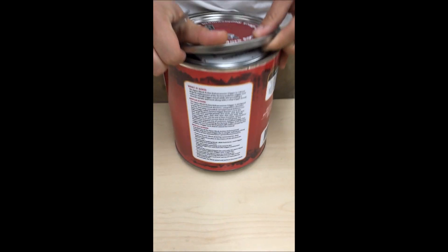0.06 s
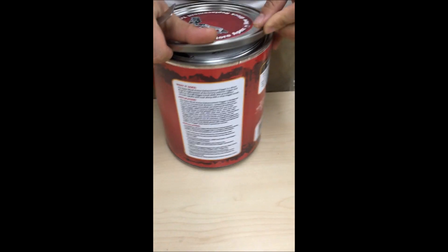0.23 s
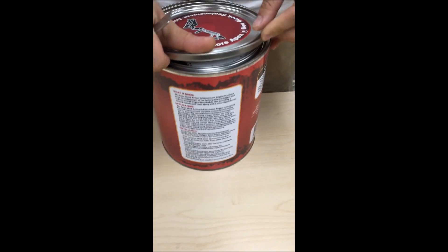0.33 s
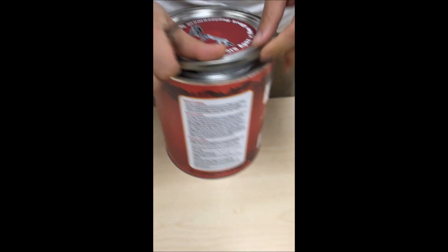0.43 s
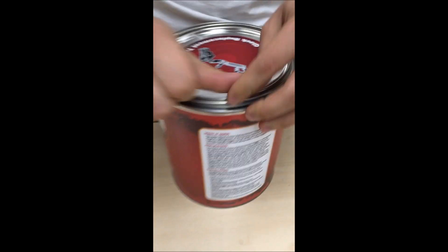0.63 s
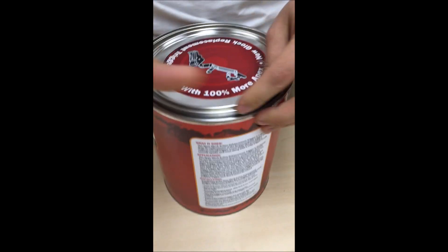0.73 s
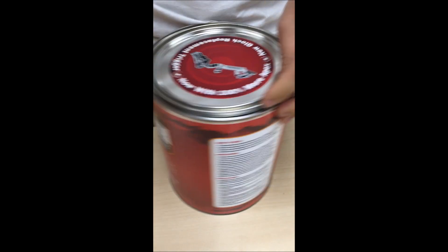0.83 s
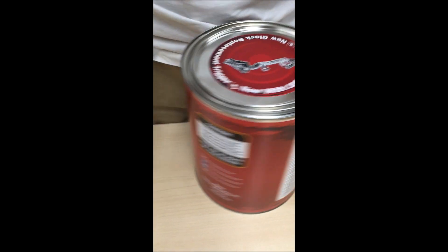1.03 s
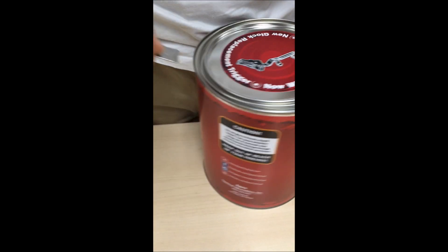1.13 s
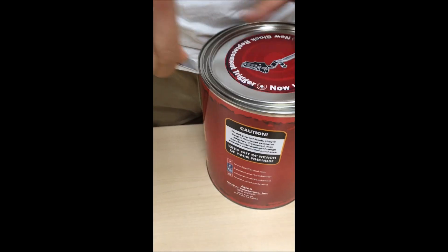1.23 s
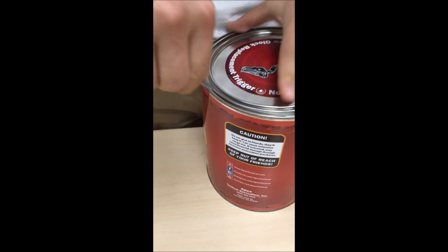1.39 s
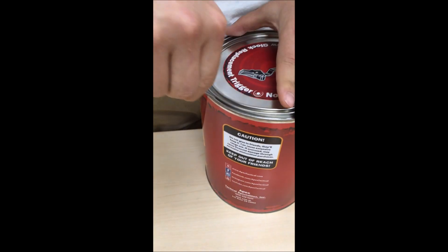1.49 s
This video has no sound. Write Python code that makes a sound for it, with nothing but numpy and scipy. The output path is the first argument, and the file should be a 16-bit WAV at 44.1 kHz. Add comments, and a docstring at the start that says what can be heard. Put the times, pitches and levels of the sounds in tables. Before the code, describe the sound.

A metal lid rubs and snaps onto a large can with a hollow thump. A dull knock and another push follow, then the can scrapes across a wooden table. Close microphone in a small, quiet room.

```python
"""A metal lid is fitted on a large can on a wooden table; small quiet room, one microphone close by.
The lid ticks twice, rubs, and snaps over the rim at 0.24 s; each push makes the enclosed air thump.
At 0.47 s the can's wall takes a dull knock, and at 0.74 s the lid is pressed home. From 0.86 s the
can is turned and scrapes across the table, its base juddering lower in pitch as it slows."""
import sys
import numpy as np
from scipy import signal
from scipy.fft import rfft, irfft
from scipy.io import wavfile
from scipy.ndimage import uniform_filter1d

SR = 44100
rng = np.random.default_rng(int(sys.argv[2]) if len(sys.argv) > 2 else 0)


def transcribe(u):
    """Save the signal u as a 16-bit wav file named by the first command-line argument.

    u: samples, shape (n,) or (channels, n), limited to [-1, 1]; the rate is SR.
    q: integer samples, one column per channel.
    """
    v = np.clip(np.atleast_2d(u).T, -1, 1)
    q = np.round(v * 32767).astype(np.int16)
    wavfile.write(sys.argv[1], SR, q)


N = 68355
T = np.arange(N) / SR

# modes of the loose lid: f/Hz, level/dB, t60/s
LID_MODES = [(716, -17.5, .08), (1052, -4, 0.092), (1446, -10, .08), (2299, -6.5, 0.11), (2942, 4.5, 0.021),
             (3503, 6.5, 0.017), (4259, 0.5, 0.029), (4604, -3.5, .025), (5820, 2.5, 0.014),
             (6030, -12, 0.061), (6490, 0.5, 0.03), (8220, -6.5, 0.035), (9180, -1, .02), (12200, -3, .018)]
# modes of the can's wall: f/Hz, level/dB, t60/s
WALL_MODES = [(305, -5.5, .08), (465, -6, 0.13), (597, -0.5, 0.13), (735, 0.5, .065), (927, -6.5, 0.071),
              (1019, -12, 0.073), (1290, -7.5, 0.12), (1392, -8.5, 0.1), (1527, -3.5, 0.037),
              (1920, -13, 0.076), (2236, -20, .07)]


def amp(db):
    """Decibels to gain."""
    return 10 ** (np.asarray(db) / 20)


def unit(x):
    """Scale to rms 1."""
    return x / np.sqrt(np.mean(x ** 2))


def curve(rows, column=1):
    """One column of a table, joined by straight lines in time."""
    rows = np.array(rows)
    return np.interp(T, rows[:, 0], rows[:, column])


def through(x, response):
    """Sound passed through an impulse response."""
    return signal.fftconvolve(x, response)[:N]


def colour(x, spectrum, size=8192):
    """Minimum-phase filter of unit power with the given spectral shape."""
    hz, db = np.array(spectrum).T
    gain = amp(np.interp(np.log(np.fft.rfftfreq(size, 1 / SR) + 1), np.log(hz), db))
    cepstrum = irfft(np.log(unit(gain)))
    cepstrum[1:size // 2] *= 2
    cepstrum[size // 2 + 1:] = 0
    return through(x, irfft(np.exp(rfft(cepstrum))))


def wander(per_s):
    """Random values of rms 1, gliding from one to the next."""
    hold = int(SR / per_s)
    steps = np.repeat(rng.standard_normal(N // hold + 1), hold)
    return unit(uniform_filter1d(steps, hold)[:N])


def envelope(start, rise, t60):
    """Smooth rise, then exponential decay."""
    age = T - start
    attack = np.sin(np.pi / 2 * np.clip(age / rise, 0, 1)) ** 2
    return attack * np.exp(-np.log(1000) * np.maximum(age - rise, 0) / t60)


def ring(modes, start, rise, swell_cycles=3.5):
    """Decaying modes set going at one moment; the low ones take longer to swell."""
    return sum(amp(db) * envelope(start, max(rise, swell_cycles / hz), t60)
               * np.sin(2 * np.pi * (hz * T + rng.random())) for hz, db, t60 in modes)


def room_tone(level_db=-60.5):
    """The faint, steady air of the room."""
    # spectrum of the room's air: f/Hz, level/dB
    spectrum = [(25, -22), (45, -11), (70, -1), (140, -4), (260, -19.5), (550, -24), (1000, -34.5),
                (2200, -25.5), (3000, -34), (5000, -41.5), (10000, -36.5), (16000, -39)]
    return amp(level_db) * colour(rng.standard_normal(N), spectrum)


def room(x, reverb_db=-18):
    """The direct sound at the microphone, followed by a small room's short, dull reverberation."""
    # spectrum of the reverberation: f/Hz, level/dB
    spectrum = [(60, -15), (150, -5.5), (400, 1), (1200, -13.5), (3000, -13), (7000, -16.5), (16000, -18.5)]
    decay = envelope(start=.0026, rise=.0026, t60=.21)
    tail = unit(rng.standard_normal(N) * decay) / np.sqrt(N)
    return x + amp(reverb_db) * through(x, colour(tail, spectrum))


def table_rumble():
    """The wooden table rumbles low under the can."""
    # course of the rumble: t/s, level/dB
    levels = [(0, -72), (.05, -55), (.12, -72), (.3, -57), (.42, -54), (.6, -54.5), (.73, -46), (.775, -38),
              (.83, -52), (.89, -77), (.95, -52), (.99, -36), (1.035, -68), (1.09, -54), (1.25, -52),
              (1.42, -56.5), (1.55, -60)]
    # spectrum of the rumble: f/Hz, level/dB
    spectrum = [(20, -32), (40, -17), (55, -13), (66, -2.5), (85, -4.5), (130, -18), (250, -42.5),
                (600, -75)]
    return unit(colour(rng.standard_normal(N), spectrum)) * amp(curve(levels))


def fine_ringing(x, from_hz=1130, direct_db=1, ring_db=-8):
    """A short random response gives the hiss a dense, quickly damped ringing colour."""
    decay = envelope(start=0, rise=1 / SR, t60=.026)
    response = unit(rng.standard_normal(N) * decay) / np.sqrt(N)
    response = signal.sosfilt(signal.butter(2, from_hz, "high", fs=SR, output="sos"), response)
    return amp(direct_db) * x + amp(ring_db) * through(x, response)


def grains(per_s=7600, spread_db=1.5):
    """Dense tiny slips of uneven size."""
    slips = rng.random(N) < per_s / SR
    return unit(slips * rng.standard_normal(N) * amp(spread_db * rng.exponential(size=N)))


def friction(levels, spectrum, modes, ring_db, flutter_db=.74):
    """Fluttering slips, heard with a fine ringing and through the main modes of the rubbed part."""
    slips = grains() * amp(curve(levels) + flutter_db * wander(per_s=45))
    body = unit(ring(modes, 0, 1 / SR)) / np.sqrt(N)
    return fine_ringing(colour(slips, spectrum)) + amp(ring_db) * through(slips, body)


def fingers():
    """Fingers hiss over the lid and stir its modes."""
    # course of the fingers' sliding: t/s, level/dB
    levels = [(0, -57.5), (.055, -71), (.1, -73.5), (.19, -61), (.235, -47), (.275, -60), (.33, -63.5),
              (.415, -49), (.46, -63), (.52, -64.5), (.58, -59), (.65, -57.5), (.735, -48.5), (.775, -75),
              (.86, -66), (.95, -75), (1.41, -81), (1.445, -70.5), (1.55, -82)]
    # spectrum of skin on metal: f/Hz, level/dB
    spectrum = [(800, -5.5), (2200, -2), (3600, 1), (4900, -3), (6400, 1.5), (8000, -3), (9400, 1),
                (11000, -9), (14500, -8.5), (16000, -17.5)]
    return friction(levels, spectrum, LID_MODES, ring_db=-3.5)


def lid_rub():
    """The lid rubs on the rim until it is seated, stirring the can's wall."""
    # course of the rubbing: t/s, level/dB
    levels = [(0, -47.5), (.06, -56.5), (.09, -70.5), (.125, -55), (.16, -45.5), (.235, -40), (.32, -48.5),
              (.345, -45.5), (.375, -39), (.415, -37), (.45, -50), (.54, -47), (.6, -52), (.66, -47),
              (.735, -40), (.77, -66), (.85, -72)]
    # spectrum of lid on rim: f/Hz, level/dB
    spectrum = [(60, -22), (150, 9.5), (280, 8.5), (420, 0.5), (750, -1.5), (1300, -7.5), (2300, -8.5),
                (4000, -30), (8000, -30), (16000, -48)]
    return friction(levels, spectrum, WALL_MODES, ring_db=-5) * (T < levels[-1][0])


def can_scrape(judder_width_hz=78):
    """The base scrapes and judders unevenly, lower in pitch as the can slows."""
    # course of the scrape: t/s, level/dB
    levels = [(.86, -66.5), (.895, -50.5), (.93, -42.5), (.98, -36), (1.025, -40.5), (1.07, -36),
              (1.11, -39), (1.15, -41.5), (1.23, -39.5), (1.28, -45), (1.325, -65), (1.39, -83.5)]
    # spectrum of metal on wood: f/Hz, level/dB
    spectrum = [(100, -12), (200, 5), (330, 2), (470, -3), (620, 0), (950, -2), (1150, -8.5), (1400, -7.5),
                (2500, -14), (3800, -17.5), (5000, -19), (6500, -18), (8800, -15), (10500, -24),
                (12500, -21.5), (16000, -34.5)]
    # modes of the can's base: f/Hz, level/dB, t60/s
    base_modes = [(330.6, -2, 0.059), (562, -0.5, 0.083), (756, -4.5, 0.051), (920, -7.5, .03),
                  (1148, -7, 0.029), (1730, -17.5, 0.09), (2125, -14.5, 0.25), (2630, -7, .03),
                  (2954, -10, 0.029), (3355, -8.5, 0.029), (3910, -10, .02), (5500, -6.5, 0.022),
                  (6950, -17, 0.019), (8800, -21, 0.0064)]
    # resonance of the dragging base: t/s, f/Hz, level/dB
    resonance = [(.88, 289.2, -81), (.95, 293.3, -51.5), (.985, 283.3, -32), (1.012, 285, -33),
                 (1.035, 260.8, -51), (1.07, 185.5, -47), (1.12, 182.2, -49.5), (1.165, 174.2, -38),
                 (1.23, 162.5, -43), (1.285, 129.6, -33.5), (1.32, 126.2, -42), (1.385, 132, -73)]
    tone = np.exp(2j * np.pi * np.cumsum(curve(resonance)) / SR)
    uneven = wander(judder_width_hz) + 1j * wander(judder_width_hz)
    rough_tone = (tone * uneven / np.sqrt(np.abs(uneven))).real
    judder = unit(rough_tone) * amp(curve(resonance, column=2))
    moving = (T > levels[0][0]) & (T < levels[-1][0])
    return moving * (judder + friction(levels, spectrum, base_modes, ring_db=-4.5))


def wall_bend(start=.4748, from_hz=1126, to_hz=152, glide_s=.0053, level_db=-21):
    """The knock bends the wall: short waves arrive first, so the pitch drops to the air resonance."""
    hz = to_hz + (from_hz - to_hz) * np.exp(-np.maximum(T - start, 0) / glide_s)
    phase = 2 * np.pi * np.cumsum(hz * (T >= start)) / SR
    return amp(level_db) * envelope(start, rise=.0032, t60=.26) * np.sin(phase)


def air_thumps(overtone_db=-29.5):
    """The lid bounces on the air in the can: low tones, each with a faint octave."""
    # bounces on the enclosed air: t/s, f/Hz, level/dB, rise/s, t60/s
    bounces = [(.002, 186, -37.5, 0.0063, 0.089), (0.025, 150, -36, 0.017, 0.086),
               (.052, 154, -39, 0.0052, .04), (.243, 134.8, -6.5, .017, 0.058),
               (0.243, 334, -26, .008, 0.11), (0.745, 104.6, -9.5, 0.02, 0.043),
               (0.769, 186, -23.5, 0.008, 0.16), (0.806, 94.4, -34, 0.012, 0.13)]
    sound = np.zeros(N)
    for start, hz, db, rise, t60 in bounces:
        phase = 2 * np.pi * hz * (T - start)
        tone = np.sin(phase) + amp(overtone_db) * np.sin(2 * phase)
        sound += amp(db) * envelope(start, rise, t60) * tone
    return sound


def blows():
    """Each blow on lid, wall or rim gives a burst of contact noise and rings the struck part."""
    # two ticks, snap, knock, seating: t/s, ring level/dB, contact level/dB, rise/s, contact t60/s, part
    strikes = [(0.0206, -55.5, -52.5, 0.0018, 0.09, "lid"), (0.0468, -62, -48.5, .005, 0.042, "lid"),
               (0.2403, -21, -13, .0016, 0.029, "lid"), (0.4743, -27.5, -22, 0.0032, 0.062, "wall"),
               (0.7435, -31, -29.5, 0.0075, 0.029, "rim")]
    # modes of the rim with the lid in its groove: f/Hz, level/dB, t60/s
    rim_modes = [(1198, -3, .035), (1390, -0.5, 0.024), (1930, 0.5, 0.026), (2128, -0.5, 0.02),
                 (3170, -3, 0.014), (4450, -14.5, .025), (5330, -20, 0.046), (6200, -4.5, 0.016)]
    # contact noise of the lid ticking and snapping: f/Hz, level/dB
    snap = [(200, -1.5), (600, 3.5), (1500, -2), (3300, 3.5), (5000, -7), (6500, 0), (8000, -10),
            (12000, -9), (16000, -19)]
    # contact noise of the knock on the wall: f/Hz, level/dB
    knock = [(100, -0.5), (300, -16.5), (700, -2.5), (1400, 0), (2200, -13.5), (3200, -24), (5000, -39),
             (9000, -37), (16000, -54)]
    # contact noise of the lid seating in the rim: f/Hz, level/dB
    seat = [(200, 1), (700, 3.5), (2000, -9), (4000, -9), (7000, -9.5), (9000, -18), (12000, -20.5),
            (16000, -33)]
    parts = {"lid": (LID_MODES, snap), "wall": (WALL_MODES, knock), "rim": (rim_modes, seat)}
    sound = np.zeros(N)
    for start, ring_db, contact_db, rise, t60, part in strikes:
        modes, spectrum = parts[part]
        contact = colour(rng.standard_normal(N) * envelope(start, rise, t60), spectrum)
        sound += amp(ring_db) * ring(modes, start, rise) + amp(contact_db) * contact
    return sound


def scene():
    """The can close up in the room, over table rumble and room tone, in mono."""
    can = blows() + wall_bend() + air_thumps()
    background = table_rumble() + room_tone()
    rubbing = lid_rub() + fingers() + can_scrape()
    return (room(can + rubbing) + background)[None]


def record(dry, low_cut_hz=42, top_hz=15900):
    """The recorder thins the deepest bass and cuts the top."""
    thinned = signal.sosfilt(signal.butter(3, low_cut_hz, "high", fs=SR, output="sos"), dry)
    return signal.sosfilt(signal.ellip(10, .2, 80, top_hz, fs=SR, output="sos"), thinned)


dry = scene()
out = record(dry)
transcribe(out)
```